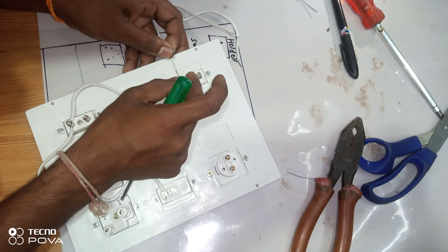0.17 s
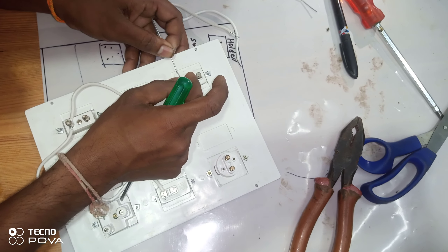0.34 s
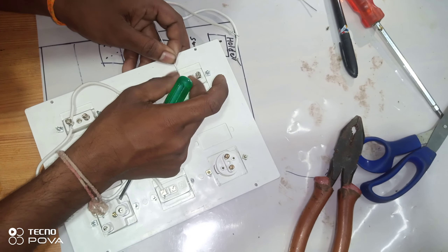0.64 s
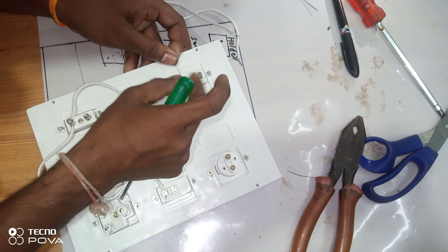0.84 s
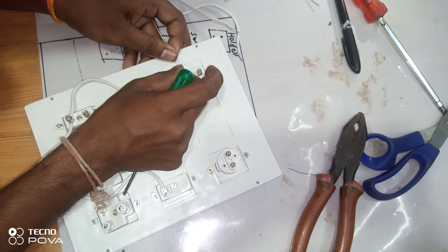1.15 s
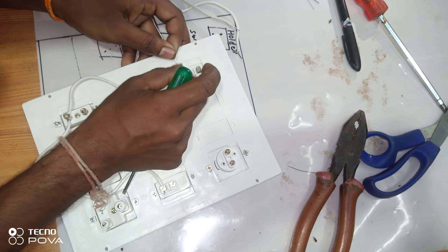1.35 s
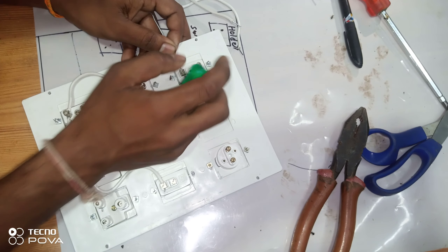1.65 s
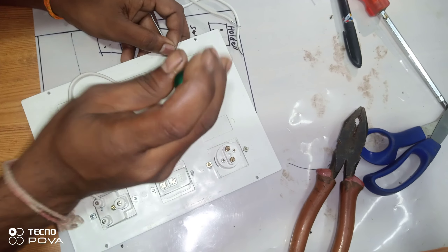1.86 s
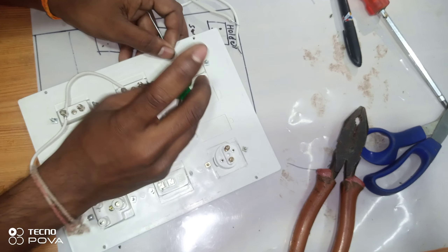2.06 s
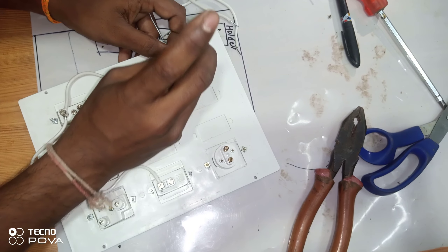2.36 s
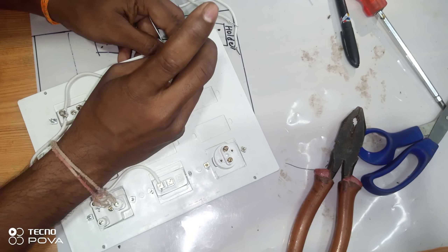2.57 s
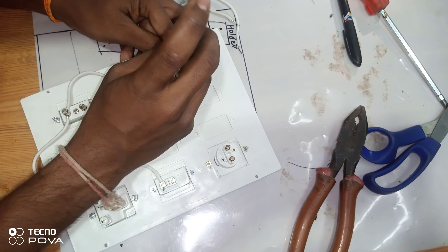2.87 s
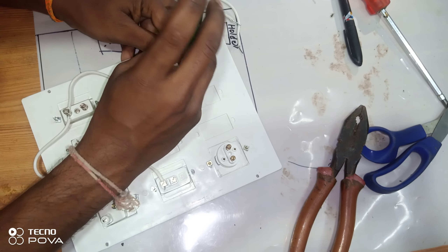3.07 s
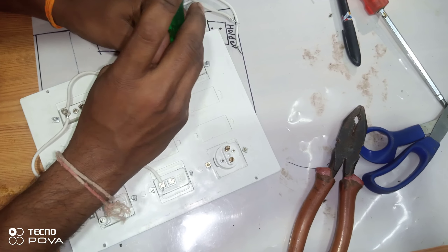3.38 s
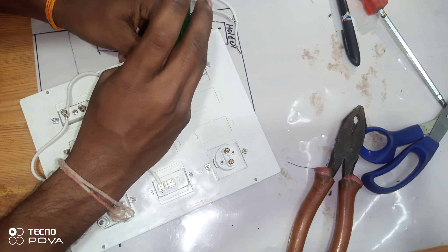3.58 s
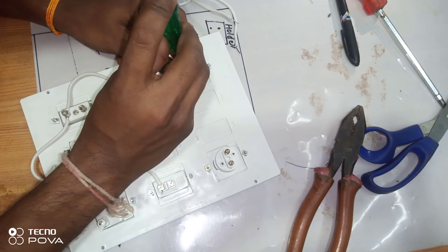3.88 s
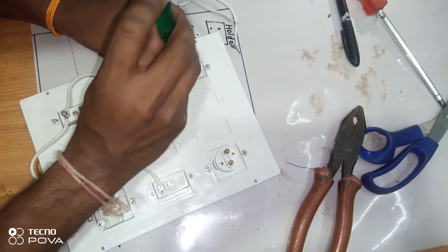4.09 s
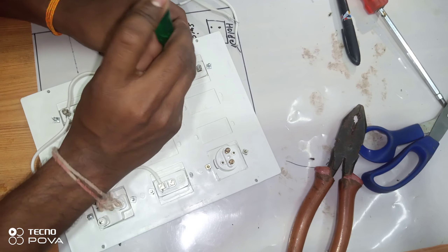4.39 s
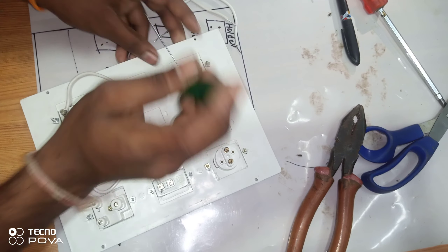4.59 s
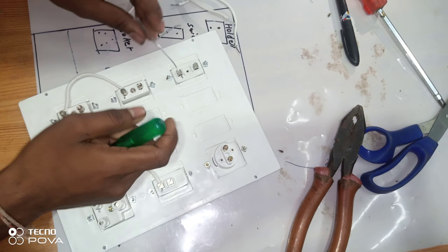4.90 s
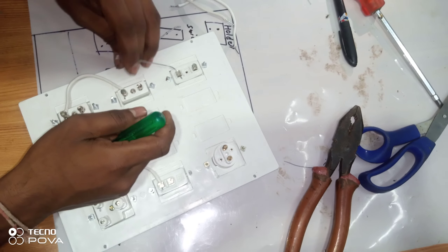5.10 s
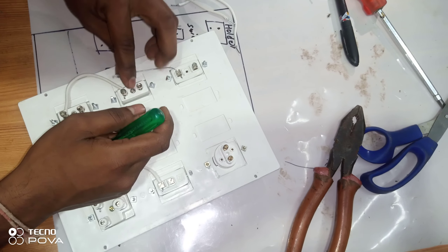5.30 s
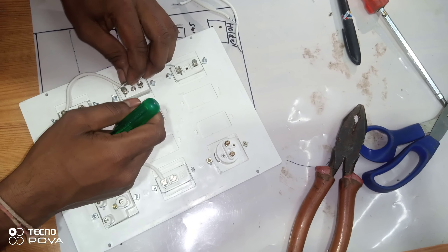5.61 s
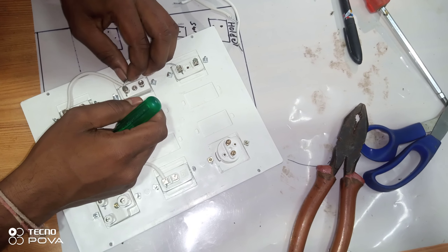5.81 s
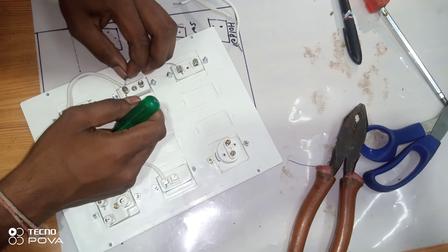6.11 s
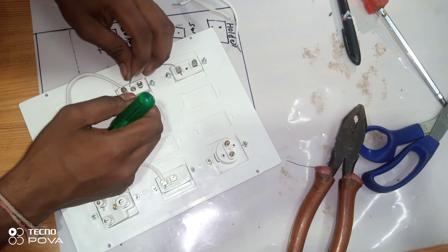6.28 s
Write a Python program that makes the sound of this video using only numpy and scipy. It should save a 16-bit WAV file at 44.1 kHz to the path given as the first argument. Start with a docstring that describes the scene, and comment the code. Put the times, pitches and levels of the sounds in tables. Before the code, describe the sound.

Over constant fan noise, light metallic clicks and grating give way to one hard plastic knock and two lighter ones.

```python
"""A small screwdriver works the terminal screws of a plastic switchboard on a table in a bare room.
A fan hisses throughout, with wavering bands; faint short high tones come and go.
From 0.5 s the table thuds now and then. Around 1 s the steel tip ticks and grates on brass screws.
Just after 2 s a hard knock rings the board, which rattles; the phone microphone limits the peak.
Two lighter knocks follow near 4.8 and 5 s, then a few more soft thuds."""
import sys
import numpy as np
from scipy import signal
from scipy.fft import rfft, irfft
from scipy.io import wavfile
from scipy.ndimage import uniform_filter1d, minimum_filter1d

SR = 44100
rng = np.random.default_rng(int(sys.argv[2]) if len(sys.argv) > 2 else 0)


def pcm_store(signal):
    """Save signal as 16-bit PCM."""
    levels = np.round(np.clip(np.atleast_2d(signal), -1, 1) * 32767)
    wavfile.write(sys.argv[1], SR, levels.astype(np.int16).T)


N = 284445


def amp(db):
    return 10 ** (np.asarray(db) / 20)


def unit_rms(x):
    return x / np.sqrt(np.mean(x ** 2) + 1e-20)


def at_hz(curve, hz):
    """Curve value, interpolated over log frequency."""
    curve_hz, values = np.transpose(curve)
    return np.interp(np.log(hz), np.log(curve_hz), values)


def drift(rate_hz):
    """Slow random motion, unit rms."""
    step = 40
    pole = np.exp(-2 * np.pi * rate_hz * step / SR)
    slow = signal.lfilter([1], [1, -2 * pole, pole ** 2], rng.standard_normal(N // step + 2002))[2000:]
    return np.interp(np.arange(N) / step, np.arange(len(slow)), unit_rms(slow))


def ring(x, hz, t60_s):
    """Resonator: a unit impulse starts a decaying unit sine."""
    radius, angle = amp(-60 / (t60_s * SR)), 2 * np.pi * hz / SR
    return signal.lfilter([0, np.sin(angle)], [1, -2 * radius * np.cos(angle), radius ** 2], x + 1e-18)


def resonate(x, hz, width_hz):
    """Resonator set by bandwidth."""
    return ring(x, hz, t60_s=np.log(1000) / (np.pi * width_hz))


def impulses(start_s, heights):
    """Single-sample blows, one row per row of heights."""
    out = np.zeros(np.shape(heights)[:-1] + (N,))
    out[..., (np.asarray(start_s) * SR).astype(int)] = heights
    return out


def noise_spectrum(colour, size):
    """Coloured noise: FFT bins and their frequencies."""
    hz = np.maximum(np.fft.rfftfreq(size, 1 / SR), 1)
    return rfft(rng.standard_normal(size)) * amp(at_hz(colour, hz)), hz


def noise_bands(colour, size):
    """Coloured noise in overlapping half-octave bands: (centre_hz, band) pairs."""
    bins, hz = noise_spectrum(colour, size)
    for centre_hz in 22 * 2 ** np.arange(0, 10, .5):
        offset = np.clip(2 * np.log2(hz / centre_hz), -1, 1)
        yield centre_hz, irfft(bins * np.cos(np.pi * offset / 2) ** 2, size)


def swell(start_s, level_db, hz, t60_s, width_hz, rise_s):
    """Narrow-band noise with soft rise and exponential decay, scaled to its envelope's energy."""
    t = np.arange(SR // 2) / SR
    noise = rng.standard_normal(3 * SR // 4)
    tone = resonate(resonate(noise, hz, width_hz), hz, width_hz)[-len(t):]
    envelope = (1 - np.exp(-(t / rise_s) ** 2)) * amp(level_db - 60 * t / t60_s)
    sound = unit_rms(envelope * tone) * np.sqrt(np.mean(envelope ** 2))
    return np.pad(sound, (int(start_s * SR), N))[:N]


# Fan spectrum, low and high parts: freq_hz, density_db
FAN_WHIRR = [(15, -64), (30, -21), (60, -19), (85, -20.5), (130, -4), (175, -11.5), (210, -4), (280, -14),
             (380, -10), (480, -9), (600, -13.5), (1050, -15.5)]
FAN_HISS = [(1200, -9), (2100, -7.5), (2900, 0), (3800, -1), (4600, -14), (5800, -24), (7000, -32.5),
            (8000, -48), (13700, -55.5), (14800, -47), (16000, -43)]
# Wavering fan bands: centre_hz, width_hz, rms_db, waver_db
FAN_BANDS = [(121.4, 6.2, -76.5, 4.5), (378.7, 36, -65, 4), (470, 5.4, -71, 4)]

def fan(hiss_rms_db=-48.5):
    """Broad hiss whose bands flicker partly together, plus narrow wavering bands."""
    common_db = 0.69 * drift(25)
    hiss = sum(band * amp(common_db + 1.26 * drift(18))
               for _, band in noise_bands(FAN_WHIRR + FAN_HISS, N))
    out = amp(hiss_rms_db) * unit_rms(hiss)
    for centre_hz, width_hz, rms_db, waver_db in FAN_BANDS:
        narrow = resonate(rng.standard_normal(N), centre_hz, width_hz)
        out += amp(rms_db) * unit_rms(narrow * amp(waver_db * drift(4.1)))
    return out


# Treble resonances: centre_hz, gain_db, t60_s
SHIMMER_BANDS = [(4550, -63, .04), (4760, -62, 0.069), (5470, -67, .05), (5700, -71, .04),
                 (6400, -75.5, .04), (6800, -75.5, 0.054), (7100, -78, .03)]

def shimmer(puffs_per_s=5.6):
    """Faint treble shimmer: random 40 ms noise puffs excite each narrow band."""
    out, window = 0, np.hanning(1800)
    for centre_hz, gain_db, t60_s in SHIMMER_BANDS:
        triggers = (rng.random(N) < puffs_per_s / SR) * amp(2 * rng.standard_normal(N))
        envelope = signal.fftconvolve(triggers, window)[:N] / np.sqrt(np.sum(window ** 2))
        out += amp(gain_db) * ring(envelope * rng.standard_normal(N), centre_hz, t60_s)
    return out


# Faint short tones: start_s, level_db, pitch_hz
FAINT_TONES = [(0.679, -56.5, 1186), (.74, -57, 693), (1.269, -48.5, 1248), (1.27, -59, 5650),
               (1.53, -52, 1170), (1.63, -59, 5650), (2.70, -62, 5500), (3.03, -60, 5540),
               (3.23, -53, 1175), (3.46, -60, 5480), (3.96, -49.5, 1190), (4.06, -60, 5510),
               (4.47, -61.5, 5430), (4.56, -52, 1170), (4.85, -53, 5450), (5.669, -61, 5550),
               (5.78, -64, 5500), (6.13, -54, 1180), (6.309, -56, 1180)]

def faint_tones():
    """Faint short high tones come and go."""
    return sum(swell(start_s, level_db, pitch_hz, t60_s=0.26, width_hz=62, rise_s=0.016)
               for start_s, level_db, pitch_hz in FAINT_TONES)


# Room decay: freq_hz, t60_s
ROOM_DECAY = [(100, .5), (500, 0.23), (2500, 0.25), (6000, 0.2), (15000, 0.15)]

def room(send, gain_db=-1, build_s=0.0055):
    """Dense echoes that build within milliseconds and decay band by band."""
    t = np.arange(SR // 2) / SR
    flat = [(20, 0), (20000, 0)]
    echoes = sum(band * amp(-60 * t / at_hz(ROOM_DECAY, hz)) for hz, band in noise_bands(flat, len(t)))
    echoes *= 1 - np.exp(-(t / build_s) ** 2)
    echoes /= np.sqrt(np.sum(echoes ** 2))
    return amp(gain_db) * signal.fftconvolve(send, echoes)[:N]


# Table-top thuds: start_s, level_db, pitch_hz, t60_s
TABLE_THUDS = [(.47, -51, 143, 0.34), (.618, -50, 148, .17), (.976, -48, 142, 0.27), (1.03, -49, 143, .15),
               (1.389, -49.5, 140.7, .15), (1.584, -48.5, 131, 0.23), (2.073, -47, 330, 0.64),
               (2.084, -39, 224, 0.24), (2.118, -43.5, 191, .24), (3.15, -49.5, 138, .3),
               (3.259, -45.5, 147, 0.15), (3.46, -54, 65, .3), (4.27, -54.5, 211, .23),
               (4.41, -50.5, 145, .9), (4.518, -54, 475, 0.16), (4.59, -54, 221, .29),
               (4.776, -33.5, 240, 0.18), (4.79, -37, 330, 0.15), (4.79, -43.5, 120, 0.55),
               (4.84, -44.5, 201, 0.26), (4.986, -38, 278.3, 0.15), (5.017, -47, 374, 0.16),
               (5.37, -53, 131.5, 0.2), (5.58, -53.5, 79, 0.2), (5.73, -51.5, 69, 0.26),
               (6.059, -54, 416, .35), (6.311, -52, 362, 0.42), (6.40, -53.5, 148, .3)]

def table_thuds(width_ratio=0.17, rise_cycles=0.95):
    """Low thuds of the table top, one noisy resonance each."""
    return sum(swell(start_s, level_db, pitch_hz, t60_s, width_ratio * pitch_hz, rise_cycles / pitch_hz)
               for start_s, level_db, pitch_hz, t60_s in TABLE_THUDS)


def struck_modes(start_s, level_db, pitch_hz, modes, spread_oct, send_db):
    """Each blow rings the modes nearest its pitch most. Rows: direct, room send."""
    out = 0
    scatter_db = 2 * rng.standard_normal((len(start_s), len(modes)))
    for k, (mode_hz, gain_db, t60_s) in enumerate(modes):
        detune = np.log2(mode_hz / pitch_hz) / spread_oct
        height = amp(level_db + gain_db - 17.8 * detune ** 2 + scatter_db[:, k]) * (-1) ** k
        out += ring(impulses(start_s, [height, height * amp(send_db)]), mode_hz, t60_s)
    return out


def contact_noise(start_s, level_db, colour, t60_s, direct_db, send_db):
    """A decaying noise burst at each contact. Rows: direct, room send."""
    bins, _ = noise_spectrum(colour, N)
    noise = unit_rms(irfft(bins, N))
    blows = impulses(start_s, amp([level_db + direct_db, level_db + send_db]))
    envelope = signal.lfilter([1], [1, -amp(-60 / (t60_s * SR))], blows)
    return noise * uniform_filter1d(envelope, size=40, origin=19)   # contact closes within 1 ms


# Tip on screw heads: start_s, ring_db, pitch_hz, grit_db
TIP_TICKS = [(.855, -70, 9000, -66), (.965, -72, 8400, -72), (1.040, -37, 4000, -56),
             (1.048, -42.5, 4170, -42), (1.051, -33, 6360, -35), (1.075, -51, 8400, -52),
             (1.112, -47, 3300, -38.5), (1.128, -37, 5750, -41), (1.141, -37, 6450, -37),
             (1.162, -58, 9050, -51), (1.252, -49, 5700, -63), (1.319, -63, 8200, -62),
             (1.388, -48, 8300, -61), (1.422, -65, 15000, -61), (1.527, -61, 8200, -70),
             (1.572, -67, 8340, -58), (1.645, -65, 8400, -66), (2.909, -77, 10800, -67),
             (3.866, -70, 12200, -65), (4.986, -43.5, 10000, -66), (5.018, -47, 9900, -78)]
# Shaft and screw modes: freq_hz, gain_db, t60_s
METAL_MODES = [(3220, 13, 0.033), (4350, 10.5, 0.014), (5640, -5.5, 0.056), (6400, -5, 0.022),
               (7250, -3, 0.022), (8350, -10.5, 0.028), (9970, -16, 0.061), (10770, -8, 0.013),
               (12700, -8, 0.016), (14900, -2, .012)]
# Steel-on-brass grit: freq_hz, density_db
GRIT_COLOUR = [(2500, -24), (4000, 0), (5200, -2), (6300, 3.5), (7500, -6), (10500, -12), (13500, -24),
               (14800, -8), (16000, -4.5)]

def screwdriver(graze_count=5, turning_s=(.75, 1.75), graze_hz=(8200, 10800), send_db=-1):
    """Light, hard contacts grate and ring shaft and screws; the turning tip adds faint random grazes."""
    when, force, pitch = rng.random((graze_count, 3)).T
    force_db = 4 * (2 * force - 1)
    grazes = [np.interp(when, [0, 1], turning_s), -68 + force_db,
              np.interp(pitch, [0, 1], graze_hz), -69 + force_db]
    start_s, ring_db, pitch_hz, grit_db = np.hstack([np.transpose(TIP_TICKS), grazes])
    metal = struck_modes(start_s, ring_db, pitch_hz, METAL_MODES, spread_oct=0.16, send_db=send_db)
    grit = contact_noise(start_s, grit_db, GRIT_COLOUR, t60_s=0.026, direct_db=0, send_db=send_db)
    return metal + grit


# Knocks and bounces: start_s, level_db, pitch_hz, spread_oct, crack_db
BOARD_KNOCKS = [(1.599, -47.5, 1500, 2.1, -78), (2.066, -15, 1670, 1.92, -19), (2.068, -32, 696, .34, -52),
                (2.076, -33, 2400, .9, -42), (2.093, -38, 2300, 1, -26), (2.102, -37, 2970, 0.38, -22),
                (2.116, -29, 1490, 0.97, -45), (4.487, -41, 2950, 0.49, -80),
                (4.78, -33, 1740, 1.22, -36.5), (4.795, -24, 2030, 1.1, -29.5),
                (4.803, -30, 3680, 0.64, -32), (4.812, -41, 3030, 0.85, -31.5), (4.822, -31, 3340, .9, -42),
                (4.974, -20.5, 1157, 0.4, -28), (4.977, -31.5, 2600, 0.37, -56),
                (4.984, -23.5, 2860, 0.27, -29), (4.995, -36, 2650, 1, -45)]
# Plastic board modes: freq_hz, gain_db, t60_s
BOARD_MODES = [(636, 2.5, 0.029), (720, 2.5, 0.036), (897, 4.5, 0.015), (1099, -4.5, 0.045),
               (1140, -4.5, 0.013), (1300, 2.5, .02), (1414, 3, 0.013), (1557, 1.5, 0.016),
               (1895, 4.5, 0.013), (2130, -1, 0.021), (2370, 2.5, 0.028), (2555, 2, 0.021),
               (2636, 6.5, 0.012), (2886, 4, 0.023), (3027, 0.5, 0.022), (3322, 5, 0.024),
               (3670, 2.5, 0.019), (3830, 5, 0.014), (4220, -1.5, .01), (4530, -24, 0.0088),
               (4700, -6, .01)]
# Crack of plastic: freq_hz, density_db
CRACK_COLOUR = [(2500, -10.5), (4000, 2), (6500, -12), (7300, -14), (8500, -27.5), (10300, -25),
                (13300, -43), (15000, -28), (16000, -39)]

def board_knocks(send_db=-6):
    """Each knock rings the board's modes, with a brief bright crack at the contact."""
    start_s, level_db, pitch_hz, spread_oct, crack_db = np.transpose(BOARD_KNOCKS)
    body = struck_modes(start_s, level_db, pitch_hz, BOARD_MODES, spread_oct, send_db)
    # Thin panel: no bass. Soft plastic contact: no top octave.
    body = signal.sosfilt(signal.butter(4, [570, 5200], "band", fs=SR, output="sos"), body)
    crack = contact_noise(start_s, crack_db, CRACK_COLOUR, t60_s=0.031, direct_db=-7.5, send_db=send_db)
    return body + crack


def scene():
    """Mono mix; only knocks and screwdriver feed the room."""
    direct, send = board_knocks() + screwdriver()
    return (direct + table_thuds() + faint_tones() + room(send) + fan() + shimmer())[None]


LIMIT_DB, LOOK_AHEAD_S, RELEASE_DB_PER_S = -9, 0.015, 104
LOW_CUT_HZ, HIGH_CUT_HZ = 60, 16250

def record(dry):
    """Phone microphone: low cut, look-ahead limiter with steady release, steep high cut."""
    mic = signal.sosfilt(signal.butter(3, LOW_CUT_HZ, "high", fs=SR, output="sos"), dry)
    over_db = np.maximum(20 * np.log10(np.abs(mic[0]) + 1e-9) - LIMIT_DB, 0)
    ramp_db = RELEASE_DB_PER_S * np.arange(N) / SR
    held_db = np.maximum.accumulate(over_db + ramp_db) - ramp_db
    ahead = int(LOOK_AHEAD_S * SR)
    coming_db = -minimum_filter1d(-over_db, ahead, origin=-(ahead // 2))
    reduction_db = uniform_filter1d(np.maximum(held_db, coming_db), size=128)
    high_cut = signal.cheby2(20, 60, HIGH_CUT_HZ, fs=SR, output="sos")
    return signal.sosfilt(high_cut, mic * amp(-reduction_db))


dry = scene()
out = record(dry)
pcm_store(out)
```